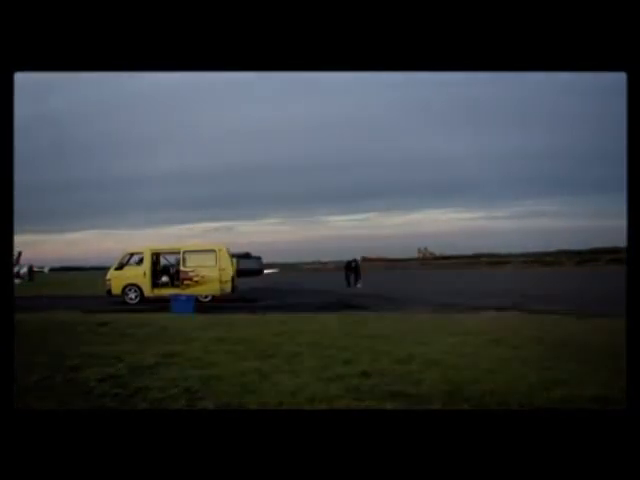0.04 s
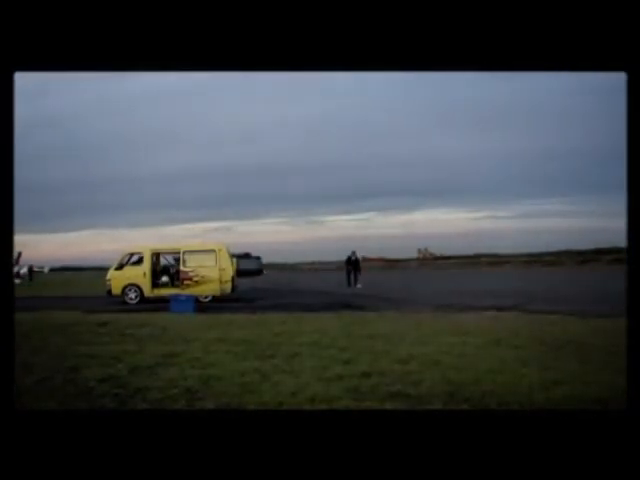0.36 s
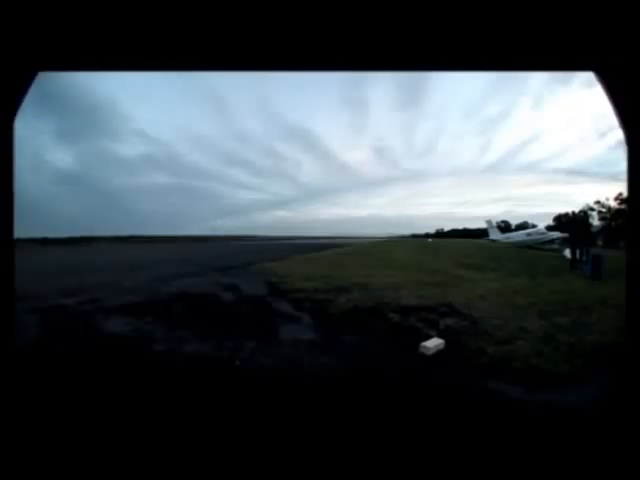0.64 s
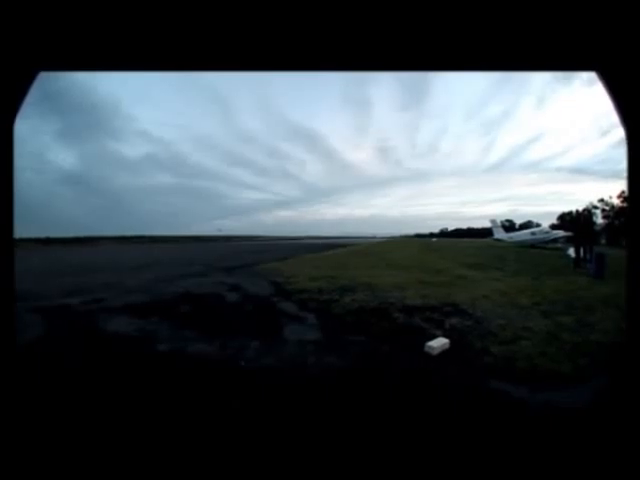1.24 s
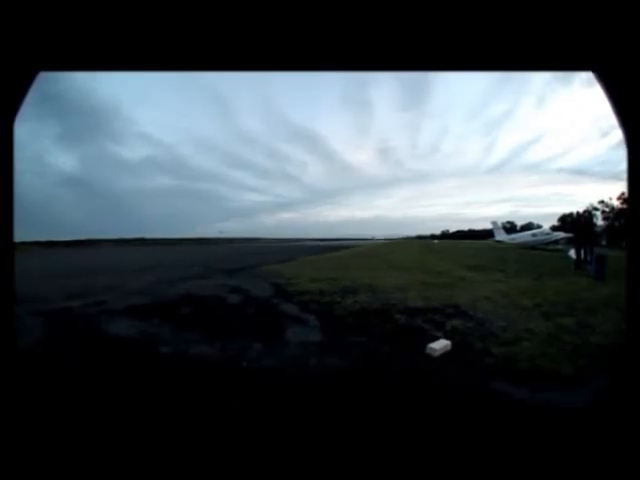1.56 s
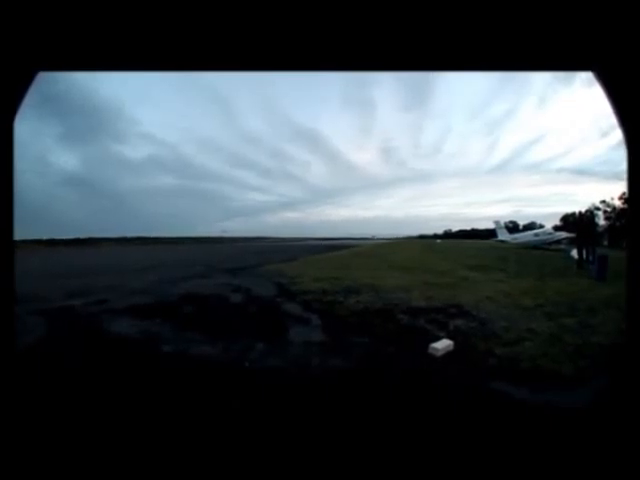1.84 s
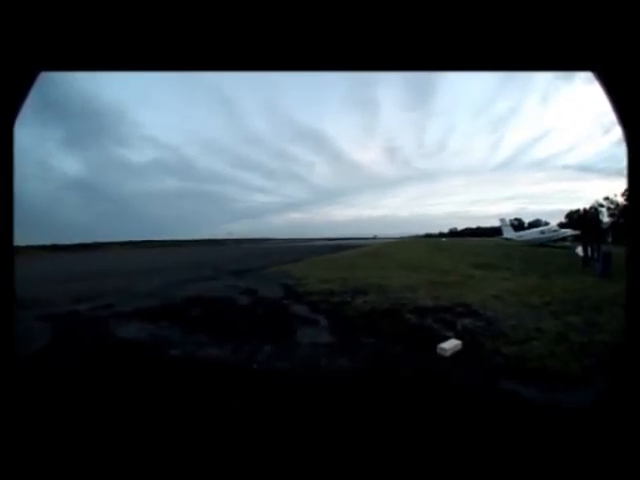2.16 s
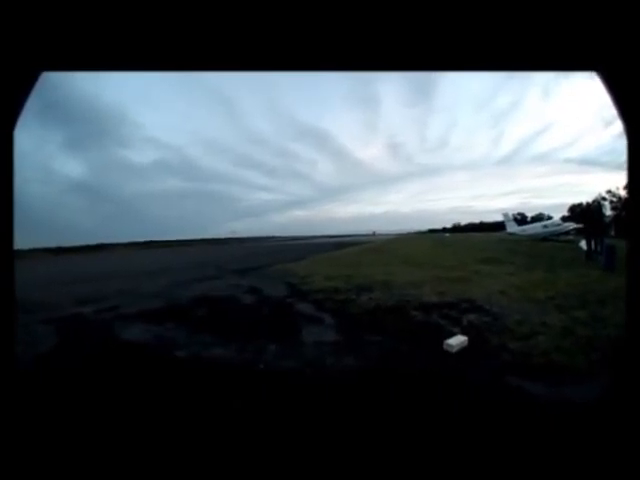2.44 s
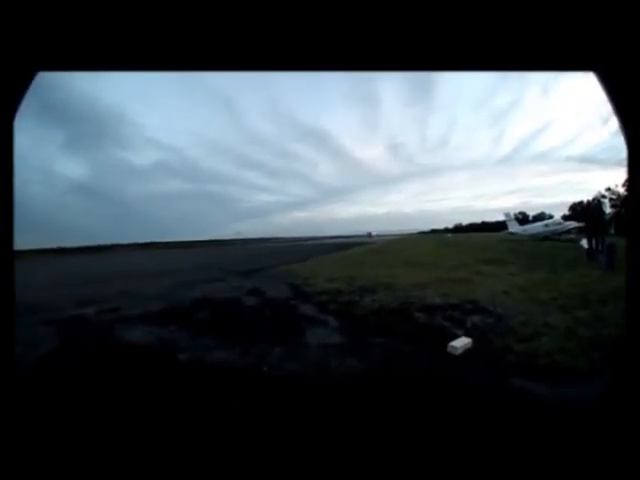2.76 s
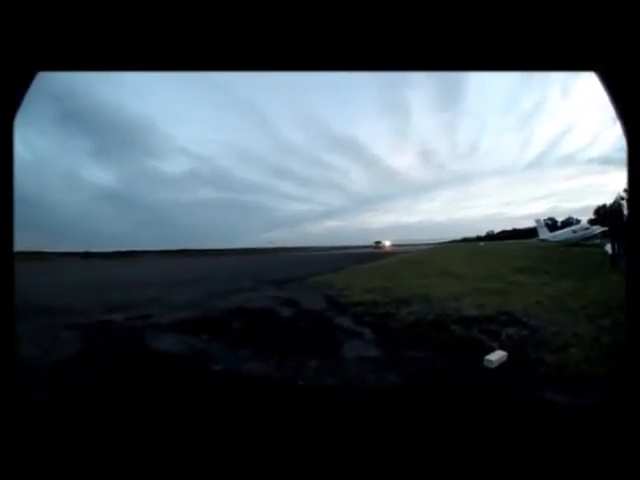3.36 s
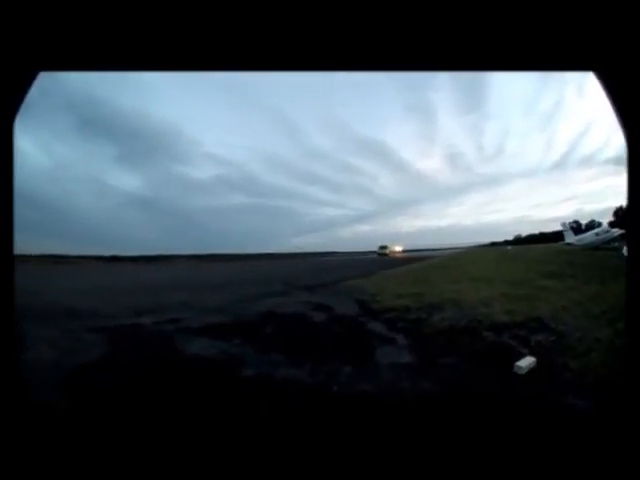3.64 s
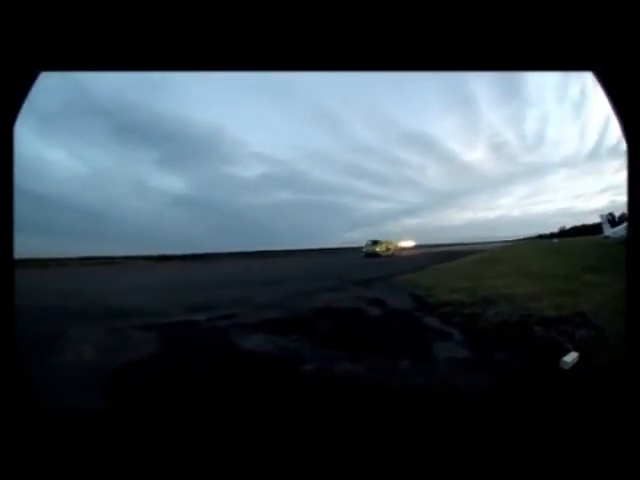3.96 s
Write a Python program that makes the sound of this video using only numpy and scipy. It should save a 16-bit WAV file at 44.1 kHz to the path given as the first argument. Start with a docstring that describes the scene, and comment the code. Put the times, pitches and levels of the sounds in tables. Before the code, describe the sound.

A jet engine hisses up close, then its distant rumble swells as the van approaches.

```python
"""An airfield, a stereo microphone close to a standing jet-powered van: loud intake hiss and the whine of
blade tones on the shaft's orders, over a light exhaust rumble, with one dull tap. After an abrupt cut the
van is far down the runway at full thrust. The exhaust's deep boom and rumble carry from there; a dull
rush swells and brightens as it nears the microphone, with a faint climbing blade whistle and a brief
whistle from the compressor. Moving air makes the jet noise flutter."""
import sys
import numpy as np
from scipy import signal
from scipy.fft import rfft, irfft
from scipy.io import wavfile

SR = 44100
rng = np.random.default_rng(int(sys.argv[2]) if len(sys.argv) > 2 else 0)


def waveform_to_disk(signal):
    """Save audio, clipped to [-1, 1], as 16-bit WAV at the path in sys.argv[1]."""
    frames = np.transpose(np.atleast_2d(signal))
    scaled = np.clip(frames, -1, 1) * 32767
    samples = np.round(scaled).astype(np.int16)
    wavfile.write(sys.argv[1], SR, samples)


N = 176400
TIME = np.arange(N) / SR
FREQS = np.maximum(np.arange(N // 2 + 1) * SR / N, 1)
LEFT_RIGHT = np.array([[1], [-1]])
SHAFT_HZ, SHAFT_WOBBLE = 98.43, .0002


def from_db(db):
    """Decibels to gain."""
    return 10 ** (np.asarray(db) / 20)


def rms_one(x):
    """Scale to unit power."""
    return x / np.sqrt(np.mean(x ** 2) + 1e-20)


def in_time(rows, column=1):
    """One column of a curve at every sample."""
    rows = np.array(rows)
    return np.interp(TIME, rows[:, 0], rows[:, column])


def over_hz(rows):
    """The columns of a table at every frequency."""
    hz, *columns = np.transpose(rows)
    return [np.interp(np.log(FREQS), np.log(hz), column) for column in columns]


def drift(rate_hz):
    """Random flutter of spread 1 around a rate, without slow surges."""
    count = N // 40
    ratio = np.arange(count // 2 + 1) * SR / N / rate_hz
    shape = ratio / np.hypot(ratio, .25) / (1 + ratio ** 2)
    flutter = irfft(rfft(rng.standard_normal(count)) * shape, count)
    return np.interp(TIME, np.linspace(0, N / SR, count), rms_one(flutter))


def turbulence(spectrum, image, swell_db, patchy_db, flicker_hz):
    """Stereo jet noise of unit power; moving air makes it flutter as a whole and octave by octave."""
    alike, pan_db, lead = over_hz(image)
    alike = np.clip(alike, 0, .999)
    low_hz, high_hz = spectrum[0][0], spectrum[-1][0]
    skirts = 1 / (1 + (FREQS / high_hz / 2) ** 4) / (1 + (low_hz / FREQS / 2) ** 4)
    mid, side = rfft(rng.standard_normal((2, N)))
    pair = np.sqrt(1 + alike) * mid + LEFT_RIGHT * np.sqrt(1 - alike) * side
    pair *= from_db(over_hz(spectrum)[0] + LEFT_RIGHT * pan_db / 2) * skirts
    pair[0] *= np.exp(1j * lead)
    octaves_down = np.clip(np.log2(high_hz / FREQS), 0, 4)
    bands = [irfft(pair * np.maximum(1 - abs(octaves_down - k), 0), N) for k in range(5)]
    flickering = sum(band * from_db(patchy_db * drift(flicker_hz)) for band in bands)
    return rms_one(flickering * from_db(swell_db * drift(flicker_hz / 2)))


# The standing van across the microphone: f/Hz, left-right likeness, left minus right/dB, left lead/rad
IDLE_STEREO = [(60, 0.9, 0, 0), (399, 0.87, -1, 0), (1200, 1, 1, 0), (3490, 1, -1, 0), (4300, .87, 2, 0.5),
               (4600, .4, 2, 0), (4850, .88, -1, -0.3), (5150, .95, -0.8, 1), (5300, .35, 0, -1.5),
               (5720, .6, 8.5, -1.5), (6150, 0.89, -4.5, -3), (6600, .3, -4, -0.3), (7150, 0.8, -0.5, -0.3),
               (7650, .5, 1, -4), (8200, 0.52, -1, 0.5), (9000, .45, -3.5, 0), (9530, .78, -4.5, 0.7),
               (10140, .99, -0.5, 0)]
# Intake spectrum from close by: f/Hz, relative level/dB
INTAKE_SPECTRUM = [(300, -22), (700, -16), (900, -5.5), (2000, -5.5), (2850, 0.5), (3400, -4.5), (4050, -2),
                   (4550, -12), (5000, -9), (5500, -14), (6300, -35), (7200, -21.5), (7700, -34),
                   (8300, -17), (9050, -20.5), (9700, -15), (10500, -20), (13200, -21), (14000, -34)]
# The hiss sways a little: t/s, level/dB
INTAKE_LEVEL = [(0, -16.5), (.21, -16.5), (.25, -18.5), (.28, -15.5), (.4, -16), (.43, -21), (.47, -15),
                (.54, -15.5)]
def intake_hiss():
    """Air drawn into the turbine hisses, close to the microphone."""
    noise = turbulence(INTAKE_SPECTRUM, IDLE_STEREO, swell_db=.5, patchy_db=.5, flicker_hz=24)
    return from_db(in_time(INTAKE_LEVEL)) * noise


# Exhaust spectrum from close by: f/Hz, relative level/dB
IDLE_EXHAUST = [(20, -26), (50, -2), (95, 2), (180, -3.5), (300, -16), (600, -17), (1200, -26)]
def idle_rumble():
    """The standing van's exhaust rumbles lightly under the hiss."""
    return from_db(-27) * turbulence(IDLE_EXHAUST, IDLE_STEREO, swell_db=-2.5, patchy_db=2.5, flicker_hz=13)


# Blade tones from close by: multiple of the shaft rate, relative level/dB
WHINE_ORDERS = [(24, -44.5), (25, -43), (28, -37), (29, -36), (30, -36.5), (31, -38.5), (32, -39),
                (37, -33.5), (41, -32), (49, -35), (50, -29.5), (51, -27.5), (53, -43.5), (60, -44),
                (61, -35.5), (62, -50), (71, -50), (72, -37.5), (73, -47.5), (74, -47), (86, -41.5),
                (96, -37), (111, -46), (120, -45)]
def turbine_whine(trim_db=-1.5, flutter_depth=.21, flutter_hz=15, spread_rad=.17):
    """Blade tones on the shaft's orders, each fluttering in the hot air and placed like the hiss."""
    turns = np.cumsum(SHAFT_HZ * (1 + SHAFT_WOBBLE * drift(3.6))) / SR
    hz, _, pan_db, lead = np.transpose(IDLE_STEREO)
    whine = np.zeros((2, N))
    for order, db in WHINE_ORDERS:
        tone_hz = order * SHAFT_HZ
        flutter = 1 + flutter_depth * (drift(flutter_hz) + 1j * drift(flutter_hz))
        stereo_phase = LEFT_RIGHT * (np.interp(tone_hz, hz, lead) / 2 + spread_rad * drift(flutter_hz))
        phase = 2 * np.pi * (order * turns + rng.random()) + stereo_phase
        gain = from_db(db + trim_db + LEFT_RIGHT * np.interp(tone_hz, hz, pan_db) / 2)
        whine += gain * rms_one(np.real(flutter * np.exp(1j * phase)))
    return whine


def shaft_comb():
    """Slightly unequal blades put weak tones on a run of shaft orders, coloured like the hiss."""
    orders = np.arange(18, 105)
    hz, db = np.transpose(INTAKE_SPECTRUM)
    gains = from_db(np.interp(orders * SHAFT_HZ, hz, db))
    turn_fraction = np.linspace(0, 1, 4096)
    cycles = np.outer(orders, turn_fraction) + rng.random((len(orders), 1))
    one_turn = gains @ np.cos(2 * np.pi * cycles)
    turns = np.cumsum(SHAFT_HZ * (1 + SHAFT_WOBBLE * drift(5))) / SR
    return from_db(-25) * rms_one(np.interp(turns % 1, turn_fraction, one_turn))


def dull_tap(at_s=.0382, peak_db=-9, band_hz=(70, 880)):
    """One short, soft pulse, dead centre."""
    click = np.interp(np.arange(N) - at_s * SR, [-1, 0, 1], [0, 1, 0])
    pulse = signal.sosfilt(signal.butter(3, band_hz, "band", fs=SR, output="sos"), click + 1e-18)
    return from_db(peak_db) * pulse / abs(pulse).max()


# The van on the runway across the microphone: f/Hz, left-right likeness, left minus right/dB, left lead/rad
RUN_STEREO = [(100, 1, 0, 0), (250, 0.98, 0.3, -0.2), (550, 0.84, -1.5, -0.4), (1000, 0.87, -3, -.22),
              (1400, .76, -3.5, 0.8), (1700, .8, -4.5, -0.3), (2100, 0.84, -2, 0.17), (2940, .83, 0, 0),
              (3320, 0.47, 0.3, -1.8), (3650, 0.56, 0.5, -2), (4300, .44, -2.5, -1.5), (4700, .2, -4, -2.4),
              (4930, .72, -6, -1.1), (5310, 0.86, -3, -3), (7200, 0.94, 0.5, -3), (9400, 0.93, -3, -3.5),
              (9900, .36, -1.5, -5), (10400, .84, -1, -5)]
# Bottom of the exhaust's spectrum: f/Hz, relative level/dB
BOOM_SPECTRUM = [(15, -31), (25, -19), (37, -8), (65, -3), (95, -1.5), (130, -4.5), (200, -23.5)]
# Boom at the microphone: t/s, level/dB
BOOM_AT_MIC = [(.53, -20.5), (.73, -34), (1.0, -26), (1.25, -25), (1.9, -27), (2.35, -22.5), (2.65, -23),
               (2.89, -19), (3.05, -21.5), (3.3, -23), (3.65, -24), (4, -27.5)]
def exhaust_boom():
    """The deepest part of the exhaust at full thrust, carrying from far down the runway."""
    noise = turbulence(BOOM_SPECTRUM, RUN_STEREO, swell_db=-1.4, patchy_db=-.4, flicker_hz=12)
    return from_db(in_time(BOOM_AT_MIC)) * noise


# Body of the exhaust's spectrum: f/Hz, relative level/dB
RUMBLE_SPECTRUM = [(60, -23), (100, -6.5), (135, -1.1), (175, -0.5), (205, -4.5), (245, -7.5), (305, -15.5),
                   (350, -14), (460, -22.5), (560, -34), (900, -41)]
# Rumble at the microphone: t/s, level/dB
RUMBLE_AT_MIC = [(.53, -17), (.7, -23), (1.0, -21.5), (1.2, -21), (1.38, -19.5), (1.49, -17), (1.6, -22),
                 (2.2, -20.5), (2.75, -20.5), (3.1, -18), (3.5, -19.5), (4, -22)]
def exhaust_rumble():
    """The exhaust's rumble carries from afar and stays strong throughout the approach."""
    noise = turbulence(RUMBLE_SPECTRUM, RUN_STEREO, swell_db=1, patchy_db=-.17, flicker_hz=18)
    return from_db(in_time(RUMBLE_AT_MIC)) * noise


# Narrow band at the top of the rumble: f/Hz, relative level/dB
GROWL_SPECTRUM = [(170, -17.5), (240, 1.5), (320, -21)]
# Growl at the microphone: t/s, level/dB
GROWL_AT_MIC = [(.53, -29), (1.5, -26.5), (2.4, -40)]
def exhaust_growl():
    """The exhaust growls in the distance; the growl fades as the van nears."""
    noise = turbulence(GROWL_SPECTRUM, RUN_STEREO, swell_db=1, patchy_db=.5, flicker_hz=14)
    return from_db(in_time(GROWL_AT_MIC)) * noise


# Broad middle of the jet noise: f/Hz, relative level/dB
RUSH_SPECTRUM = [(300, -14.5), (600, -8.5), (720, -1), (820, -3), (1020, 1.5), (1400, -2.5), (1720, 0.5),
                 (2000, 0), (2300, .5), (2520, -0.1), (2750, 1.8), (2950, 0.5), (3120, -4), (4000, -5),
                 (4450, -13.5), (4900, -14.5), (5200, -19), (5800, -18.5), (6450, -26), (7050, -41.5),
                 (7500, -42.5), (8500, -39), (9400, -58), (14000, -63)]
# Rush at the microphone: t/s, level/dB
RUSH_AT_MIC = [(.53, -34.5), (1.2, -33.5), (2.1, -33), (2.9, -34.5), (3.07, -30), (3.16, -33), (3.25, -28),
               (3.35, -32), (3.47, -28), (3.7, -27.5), (4, -27.5)]
def jet_rush():
    """A dull rush, steady at long range, rising in surges as the van comes closer."""
    noise = turbulence(RUSH_SPECTRUM, RUN_STEREO, swell_db=.07, patchy_db=.5, flicker_hz=6)
    return from_db(in_time(RUSH_AT_MIC)) * noise


# Low middle of the jet noise: f/Hz, relative level/dB
ROAR_SPECTRUM = [(150, -14), (290, 0), (370, 4), (520, -3), (680, -11.5), (800, -17), (980, -8.5),
                 (1250, -16.5), (2500, -39)]
# Roar at the microphone: t/s, level/dB
ROAR_AT_MIC = [(.53, -45), (1.5, -38.5), (2.05, -35.5), (2.3, -34.5), (2.55, -33), (3.1, -31), (3.6, -26.5),
               (3.8, -24), (4, -21)]
def jet_roar():
    """The jet's roar grows steadily as the distance shrinks."""
    noise = turbulence(ROAR_SPECTRUM, RUN_STEREO, swell_db=.3, patchy_db=.3, flicker_hz=9.8)
    return from_db(in_time(ROAR_AT_MIC)) * noise


# Treble of the jet noise: f/Hz, relative level/dB
SIZZLE_SPECTRUM = [(1500, -5), (2800, -3), (3250, 2.5), (3800, 1), (4450, -2.5), (4900, -2.5), (5250, -3),
                   (5750, 1.5), (6400, -7.5), (7050, -21), (7600, -14), (8600, -8.5), (9500, -24.5),
                   (10500, -31), (12500, -34), (14000, -47.5)]
# Sizzle at the microphone: t/s, level/dB
SIZZLE_AT_MIC = [(.53, -69.5), (2.05, -52.5), (2.11, -46), (2.19, -54.5), (2.85, -42.5), (3.22, -33),
                 (3.35, -35.5), (3.5, -32), (3.75, -34.5), (4, -35)]
def jet_sizzle():
    """Flickering treble that comes through as the van closes in."""
    noise = turbulence(SIZZLE_SPECTRUM, RUN_STEREO, swell_db=-.9, patchy_db=3, flicker_hz=8.9)
    return from_db(in_time(SIZZLE_AT_MIC)) * noise


# Blade whistle from up the runway: t/s, f/Hz, level before panning/dB
BLADE_GLIDE = [(2.0, 4165, -77), (2.5, 4500, -56.5), (2.7, 4700, -57), (2.85, 4810, -53), (3.05, 4800, -60),
               (3.48, 4830, -67), (3.58, 4920, -40), (3.68, 5020, -49), (4, 5030, -59)]
def blade_whistle(width_hz=52):
    """A breathy, narrow band of blade noise, right of centre, climbing as the van gathers speed."""
    phase = 2 * np.pi * np.cumsum(in_time(BLADE_GLIDE)) / SR
    band = drift(width_hz) * np.cos(phase) + drift(width_hz) * np.sin(phase)
    return from_db(in_time(BLADE_GLIDE, column=2)) * rms_one(band) * from_db(-3 * LEFT_RIGHT)


# Compressor tone at the microphone: t/s, f/Hz, level/dB
COMPRESSOR_TONE = [(3.0, 1978, -65), (3.14, 1978, -42), (3.25, 1980, -35), (3.34, 1983, -50),
                   (3.45, 1982, -38), (3.55, 1974, -33.5), (3.7, 1964, -46), (3.85, 1960, -65)]
def compressor_whistle(width_hz=11):
    """A thin compressor tone that drifts in and out on the wind."""
    phase = 2 * np.pi * np.cumsum(in_time(COMPRESSOR_TONE)) / SR
    tone = (1 + .22 * drift(width_hz)) * np.cos(phase) + .3 * drift(width_hz) * np.sin(phase)
    return from_db(in_time(COMPRESSOR_TONE, column=2)) * rms_one(tone)


# Very top of the jet noise: f/Hz, relative level/dB
TOP_HISS_SPECTRUM = [(8500, -21), (9900, 2.5), (11200, 1), (12200, -6.5), (13300, -8), (14200, -25.5)]
# Highest hiss at the microphone: t/s, level/dB
TOP_HISS_AT_MIC = [(.53, -110), (2.3, -88), (3.0, -76.5), (3.4, -61), (3.6, -53), (4, -47.5)]
def top_hiss():
    """The highest hiss only carries over a short distance, so it is heard last."""
    noise = turbulence(TOP_HISS_SPECTRUM, RUN_STEREO, swell_db=-1, patchy_db=.5, flicker_hz=12)
    return from_db(in_time(TOP_HISS_AT_MIC)) * noise


def scene(cut_s=.5272, fade_s=.016):
    """Beside the standing van, then a cut to its run towards the microphone."""
    standing = intake_hiss() + idle_rumble() + turbine_whine() + shaft_comb() + dull_tap()
    run = exhaust_boom() + exhaust_rumble() + exhaust_growl() + jet_rush() + jet_roar()
    run += jet_sizzle() + blade_whistle() + compressor_whistle() + top_hiss()
    run_share = np.clip((TIME - cut_s) / fade_s + .5, 0, 1)
    return np.sqrt(1 - run_share) * standing + np.sqrt(run_share) * run


def record(dry, ceiling=.8, stopband_hz=15600):
    """The highest peaks are rounded and the top is cut steeply."""
    rounded = dry / (1 + (dry / ceiling) ** 10) ** .1
    return signal.sosfilt(signal.cheby2(16, 70, stopband_hz, fs=SR, output="sos"), rounded)


dry = scene()
out = record(dry)
waveform_to_disk(out)
```